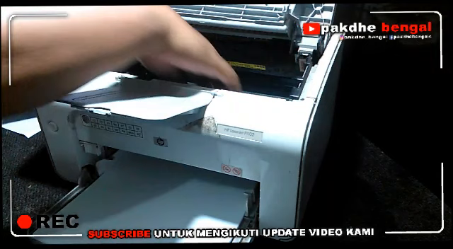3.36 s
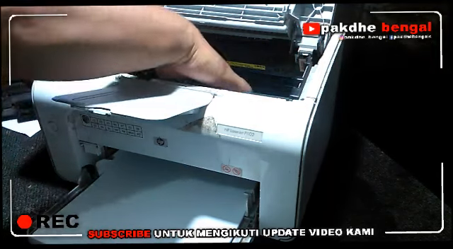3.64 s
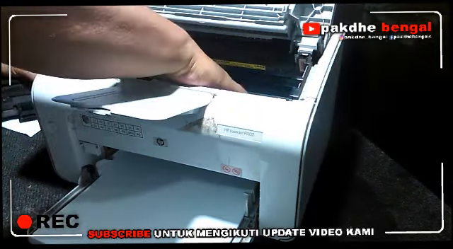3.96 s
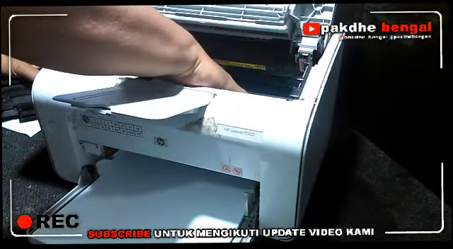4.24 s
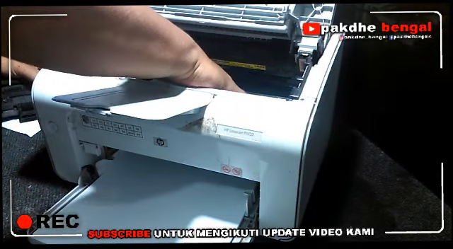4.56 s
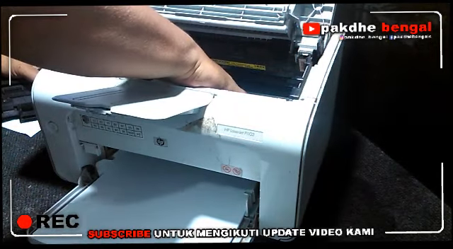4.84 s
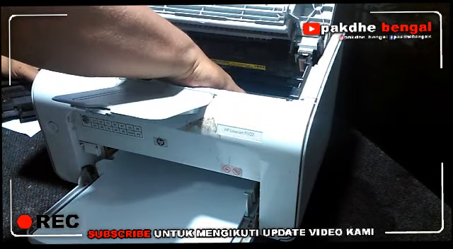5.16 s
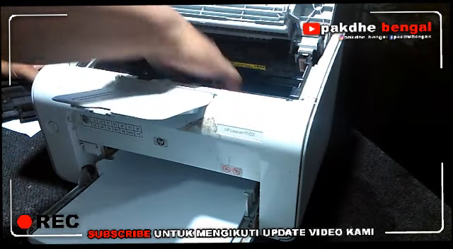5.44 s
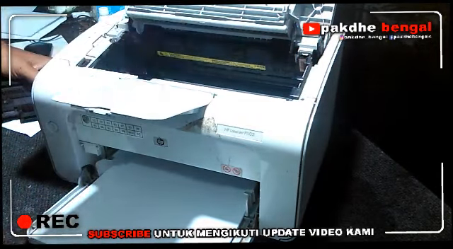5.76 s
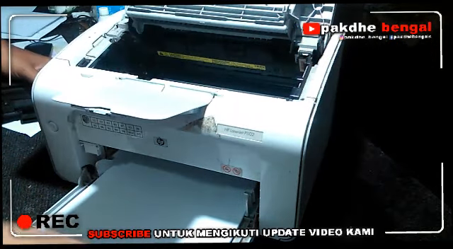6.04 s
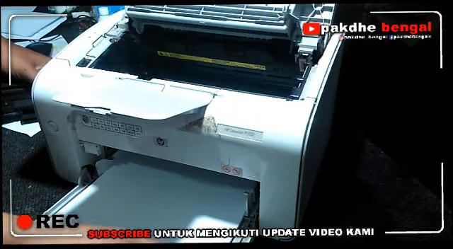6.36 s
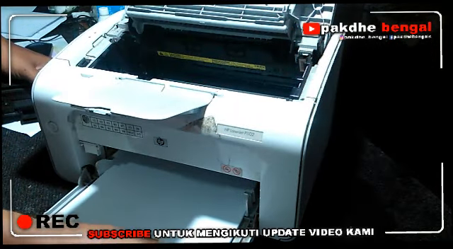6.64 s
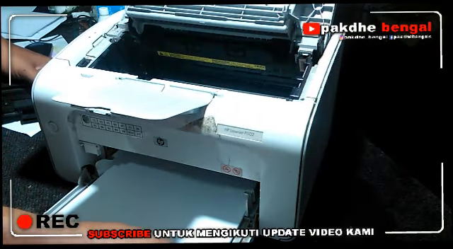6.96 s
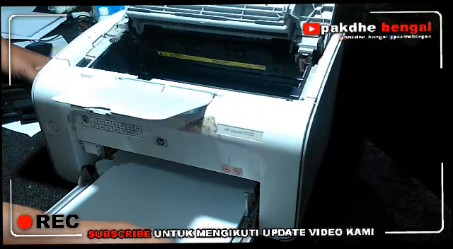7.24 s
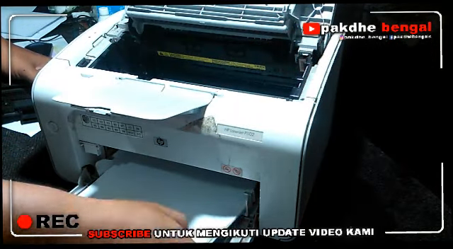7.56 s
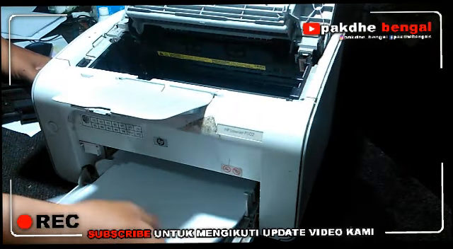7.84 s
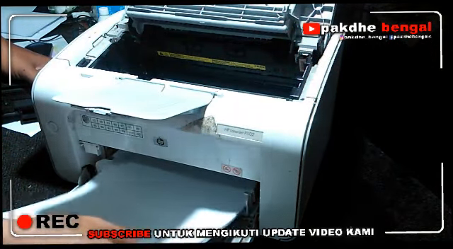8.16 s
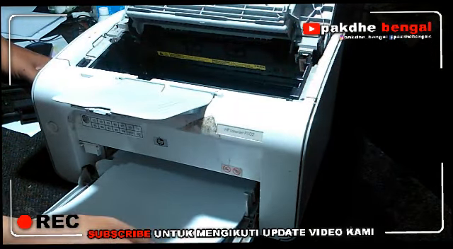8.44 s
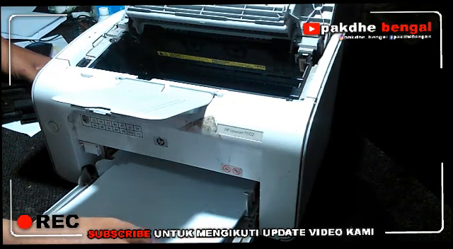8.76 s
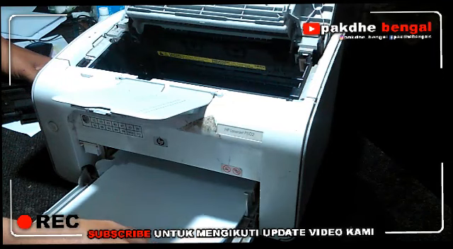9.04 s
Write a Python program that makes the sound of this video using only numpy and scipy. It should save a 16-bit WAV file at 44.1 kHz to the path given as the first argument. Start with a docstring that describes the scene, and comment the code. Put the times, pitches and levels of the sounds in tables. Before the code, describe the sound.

In a small room, hard plastic snaps, knocks and rattles as a hand seats a cartridge in a printer. The handling turns quiet, with light rubs and scattered taps, before sheets of paper are squared in the tray with crisp ticks and short swishes. High crickets, a thin hiss and a low hum continue behind. The microphone is muffled on the left, so the treble sits right.

```python
"""Plastic clacks open the scene: a hand seats a toner cartridge in a desktop printer, where it scrapes,
latches and rattles in its guides. Each hit is an edge snap, a panel knock and a chassis thump, with a
small room's tail. Fingers then brush the housing and square a stack of paper in the tray, all soft ticks
and grainy friction. Behind it, two crickets chirp on their wing resonances over a faint hum.
The left microphone port is muffled, so the highs sit to the right."""
import sys
import numpy as np
from scipy import signal
from scipy.fft import rfft, irfft, next_fast_len
from scipy.io import wavfile
from scipy.ndimage import map_coordinates

SR = 44100
rng = np.random.default_rng(int(sys.argv[2]) if len(sys.argv) > 2 else 0)


def generate_wav(sig):
    """Save sig (samples, or channels by samples) to the path in sys.argv[1] as 16-bit PCM at SR."""
    pcm = np.round(np.clip(np.atleast_2d(sig).T, -1, 1) * 32767).astype(np.int16)
    wavfile.write(sys.argv[1], SR, pcm)


N = 401310

# Tone colours. Each row: frequency in Hz, relative level in dB.
RUMBLE_EQ = [(20, -13), (45, -3.5), (75, 3.5), (160, 0.5), (300, 1.5), (440, 0), (540, -6), (800, -9),
             (1300, -25), (3000, -54.5)]  # the room's low end
SHIMMER_EQ = [(300, -17), (1000, -11), (2200, -12.5), (3300, -20.5), (4800, -22.5), (6100, -15),
              (7400, 3.5), (8400, -2), (10000, -9), (12800, -12.5), (14000, -10)]  # high, steady air
PAPER_EQ = [(300, -33), (1500, -36), (2600, 4.5), (3600, 0), (5500, -6), (7800, 7), (10000, -8.5),
            (13000, -27.5)]  # sheet on sheet
SKIN_EQ = [(500, -13), (2500, -7.5), (5000, -4.5), (7800, 6), (10000, -3), (14000, -8)]  # brushing fingers
GUIDE_EQ = [(400, -11.5), (1000, -6), (1700, -4.5), (3000, -10), (5000, -7.5), (7600, -2), (14000, -24.5)]  # the cartridge's scrape
TICK_EQ = [(1500, -49), (2800, -8), (4300, 2.5), (6000, 4.5), (7600, 7.5), (9500, -1.5), (14000, -14)]  # a lightly tapped edge
SNAP_EQ = [(1500, -23), (3000, -11.5), (4300, -6.5), (6000, -6), (7600, 1.5), (9000, -4.5), (11000, -13),
           (14000, -19)]  # a hard-hit edge
PANEL_EQ = [(150, -46.5), (350, -1.5), (700, 1), (1300, 1.5), (2800, 0), (4500, -5), (9000, -45)]  # hollow plastic
CHASSIS_EQ = [(25, -22.5), (45, -7), (70, 1), (130, -6), (220, -7.5), (320, -14), (700, -45)]  # the weight under a hit
LEFT_PORT_EQ = [(100, 0.5), (260, -1.5), (500, -4.5), (1000, -9), (2500, -20), (4500, -30.5), (7500, -44.5),
                (14000, -23)]  # the muffled side
# How alike the two ports sound. Each row: frequency in Hz, left-right correlation.
PORT_CORRELATION = [(60, 0.81), (150, 0.74), (300, 0.64), (700, 0.55), (1500, 0.16), (4000, .03)]
# An appliance's hum. Each row: frequency in Hz, level in dB.
HUM_PARTIALS = [(220, -71), (458, -65.5)]
# Fader rides. Each row: time in seconds, relative level in dB.
RUMBLE_RIDE = [(0, -64.5), (3.5, -64.5), (5, -63), (7.4, -61.5), (9.1, -64.5)]
SLOW_CRICKET_RIDE = [(0, -56.5), (3.4, -55.5), (4.4, -60), (7, -55.5)]
# Each cricket's pace. Each row: time in seconds, chirps sung so far.
FAST_CHIRP_COUNT = [(0, -.08), (2.364, 20), (4.952, 42), (6.023, 51), (9.15, 78)]
SLOW_CHIRP_COUNT = [(0, .05), (3.03, 10), (4.93, 16), (7.11, 23), (8.01, 26), (9.3, 30)]
# The hand leans on the chassis. Each row: start in seconds, level in dB.
HAND_PRESSES = [(2.48, -52), (2.76, -59.5), (3.08, -62.5), (3.84, -52.5), (4.3, -62), (4.681, -64.5)]
# Sliding strokes. Each row: start in seconds, length in seconds, relative level in dB.
PAPER_SLIDES = [(7.15, 0.17, -71), (7.51, 0.06, -58), (7.92, 0.16, -52), (8.06, 0.12, -46),
                (8.365, 0.077, -48.5), (8.44, 0.22, -57.5)]  # sheets slide over each other
FINGER_BRUSHES = [(2.82, 0.18, -68.5), (3.22, 0.19, -56), (3.52, 0.05, -52.5), (3.6, 0.18, -61.5),
                  (3.8, 0.22, -69.5), (4.5, 0.23, -70.5), (6.25, 0.13, -66), (6.59, 0.052, -67),
                  (7.66, 0.054, -52.5)]  # skin on the plastic and the top sheet
GUIDE_PUSHES = [(0.31, 0.62, -64), (0.85, 0.39, -57.5), (1.82, 0.28, -43.5)]  # the cartridge runs along its guides
# Plastic squeezes on plastic. Each row: centre in seconds, half-length in seconds, level in dB,
# pitch in Hz.
PLASTIC_RUBS = [(0.338, 0.039, -59.5, 1980), (0.447, 0.031, -50, 1740), (0.738, 0.041, -52, 1460),
                (1.575, 0.018, -47.5, 1600), (1.801, 0.0098, -41.5, 4800), (3.013, 0.019, -58, 4600),
                (3.547, 0.035, -62.5, 880), (3.865, 0.031, -55.5, 770), (8.691, 0.019, -45, 823),
                (8.831, 0.018, -60, 2430)]
# Fingers and sheet edges tap. Each row: start in seconds, relative snap, knock and thump levels in dB,
# panel pitch in Hz.
LIGHT_TAPS = [ (0.421, -71, -53, -71, 1530), (0.494, -56, -65, -47, 2740), (2.848, -51.5, -52.5, -70, 1760),
              (3.518, -56.5, -62, -55, 970), (3.846, -80, -58, -45, 800), (4.232, -50.5, -65, -60.5, 2320),
              (5.467, -51, -47, -55, 1580), (5.476, -46.5, -44, -43, 1290), (5.497, -43.5, -50, -41.5, 683),
              (7.182, -64, -62.5, -45.5, 3050), (7.277, -67, -64, -50.5, 1200),
              (7.550, -34.5, -37.5, -48, 3030), (7.592, -47.5, -71, -52, 1400),
              (7.678, -41, -67, -65, 2500), (7.728, -46, -83, -69, 2500), (7.875, -43, -58.5, -75, 2520),
              (7.910, -41, -47.5, -64, 1090), (7.928, -41, -40, -72, 2770),
              (8.045, -47.5, -49.5, -46, 1100), (8.379, -44.5, -60.5, -51, 2600),
              (8.524, -52.5, -44.5, -74, 1430), (8.679, -53, -57, -54.5, 900)]
# The cartridge hits the housing. Each row: start in seconds, relative snap, knock and thump levels in dB,
# panel pitch in Hz, snap and knock loss per rebound in dB.
CARTRIDGE_CLACKS = [ (0.001, -32.5, -43, -51.5, 4800, 4.5), (0.851, -34.5, -39.5, -44, 1800, 20.5),
                    (0.863, -29, -31, -33, 680, 5), (1.017, -52, -41, -46, 900, 2.5),
                    (1.046, -42.5, -34, -47, 1560, 0), (1.056, -17.5, -27.5, -39.5, 1390, 18),
                    (1.424, -44, -56.5, -54.5, 2970, 18.5), (1.601, -22.5, -30, -31.5, 1260, -0.5),
                    (1.648, -13.5, -25, -38, 1880, 15), (1.813, -35.5, -64, -54, 4630, 22),
                    (1.854, -28.5, -34, -32.5, 804, 12), (1.930, -29.5, -34, -36.5, 710, 7.5),
                    (2.034, -24.5, -29.5, -42.5, 1160, 17), (2.092, -33, -54, -36, 1500, 11),
                    (2.115, -36, -35.5, -37, 1180, 15.5), (2.171, -35, -39, -41.5, 353, 23),
                    (2.186, -36, -35, -47, 1300, 16), (2.218, -46.5, -43, -54, 680, 26)]

CONTACT_TIME = np.arange(-SR // 20, SR * 9 // 20) / SR  # seconds around a contact


def amp(db):
    """Decibels to gain."""
    return 10 ** (np.asarray(db) / 20)


def unit(x):
    """Scale to rms 1."""
    return x / np.sqrt(np.mean(x ** 2) + 1e-20)


def along(points, hz):
    """Read (Hz, value) points on a log frequency axis."""
    f, v = np.transpose(points)
    return np.interp(np.log(hz + 1), np.log(f + 1), v)


def curve(rows):
    """Automation: (seconds, value) rows as one value per sample."""
    return np.interp(np.arange(N) / SR, *np.transpose(rows))


def wobble(rate):
    """Smooth random modulation, with rate knots a second."""
    return map_coordinates(rng.standard_normal(int(N * rate / SR) + 4), [np.arange(N) * rate / SR])


def filtered(x, response):
    """Shape x with a frequency response."""
    size = next_fast_len(N + SR // 2)
    return irfft(rfft(x, size) * response(np.fft.rfftfreq(size, 1 / SR)), size)[..., :N]


def noise(eq):
    """Two unrelated noises of rms 1 in the given colour."""
    return unit(filtered(rng.standard_normal((2, N)), lambda hz: amp(along(eq, hz))))


def resonance(hz, centre, half_width):
    """A bell-shaped peak of height 1."""
    return 1 / (1 + ((hz - centre) / half_width) ** 2)


def swell(start, rise, length, t60):
    """Envelope of one movement: it builds over rise, holds until length, then dies away."""
    t = np.arange(N) / SR - start
    return np.clip(t / rise, 0, 1) * amp(-60 * np.maximum(t - length, 0) / t60)


def burst(response, envelope, uneven_db=4.5):
    """Shaped noise as dense damped modes; each contact point favours some and starves others."""
    size = len(envelope)
    hz = np.fft.rfftfreq(size, 1 / SR)
    favour = map_coordinates(rng.standard_normal(400), [2 * np.sqrt(hz)], order=1)
    spectrum = rfft(rng.standard_normal((2, size))) * response(hz) * amp(uneven_db * favour)
    return envelope * unit(irfft(spectrum, size))


def room_tone():
    """The bed: low rumble, an appliance's wavering hum and a high, steady shimmer."""
    t = np.arange(N) / SR
    hum = np.zeros((2, N))
    for hz, db in HUM_PARTIALS:
        peak = np.sqrt(2) * amp(db + 3.1 * wobble(8))
        hum[1] += peak * np.sin(2 * np.pi * hz * t + 0.6 * wobble(9))
    rumble = amp(curve(RUMBLE_RIDE) + 3.5 + wobble(13)) * noise(RUMBLE_EQ)
    shimmer = amp(-58.5 + .5 * wobble(1.7)) * noise(SHIMMER_EQ)
    return rumble + hum + shimmer


def cricket(chirp_count, wing_hz, half_width_hz, chirp_width, echo_t60):
    """Each chirp swells and fades on the wing's resonance; echoes blur it into a narrow rasp."""
    phase = (curve(chirp_count) + .5) % 1 - .5  # in chirp cycles, like chirp_width
    power = np.exp(-(phase / chirp_width) ** 2)
    feedback = amp(-60 / (echo_t60 * SR)) ** 2
    echo = signal.lfilter([1 - feedback], [1, -feedback], power)
    white = rng.standard_normal((2, N))
    wing = unit(filtered(white, lambda hz: resonance(hz, wing_hz, half_width_hz) ** 1.06))
    return amp(wobble(15)) * wing * np.sqrt(power + .5 * echo)


def chassis_rocking(rise_s=0.035, t60=1.58):
    """The hand's pressure makes the chassis drum softly on the table."""
    body = unit(filtered(rng.standard_normal((2, N)), lambda hz: resonance(hz, centre=81, half_width=8)))
    power = sum((amp(db) * swell(start, rise_s, rise_s, t60)) ** 2 for start, db in HAND_PRESSES)
    return np.sqrt(power) * body


def sliding(strokes, eq, rise_share, t60, grain_db):
    """Friction: tiny catches and slips, gathering speed over the first rise_share of each stroke."""
    power = sum((amp(db) * swell(start, rise_share * length, length, t60)) ** 2
                for start, length, db in strokes)
    texture = noise(eq) * amp(grain_db * wobble(500) + 1.1 * wobble(40))
    return np.sqrt(power) * unit(texture)


def plastic_rubs(relative_width=0.079, hiss_db=-11.5):
    """Brief stick-slip squeezes: a rough band around one panel resonance."""
    t = np.arange(-SR // 6, SR // 6) / SR
    out = np.zeros((2, N + SR))
    for centre, half_length, db, pitch in PLASTIC_RUBS:
        band = lambda hz: ((hz > 300) * resonance(hz, pitch, relative_width * pitch)
                           + amp(hiss_db) * (hz < 2 * pitch))
        grit_db = 2 * map_coordinates(rng.standard_normal(130), [(t - t[0]) * 300])
        stroke = amp(db + grit_db) * np.exp(-(t / half_length) ** 2)
        first = max(round((centre + t[0]) * SR), 0)
        out[:, first:first + len(t)] += burst(band, stroke)
    return out[:, :N]


def hit_envelope(rise, t60, room_db, room_t60):
    """A brief slide into the contact, a fast decay in the plastic, the room's tail; times in seconds."""
    after = np.maximum(CONTACT_TIME, 0)
    slide = amp(-18) * np.exp(-abs(CONTACT_TIME) / .009)
    decay = np.hypot(amp(-60 * after / t60), amp(room_db - 60 * after / room_t60))
    return (1 - np.exp(-after / rise)) * decay + slide


def housing_hits(rows, edge_eq, snap, knock, thump, ring_sharpness, ring_db=5):
    """Hard edges snap, the struck panel knocks at its own pitch, the heavy chassis adds a thump."""
    out = np.zeros((2, N + SR))
    for start, snap_db, knock_db, thump_db, pitch in rows:
        ring = lambda hz: amp(ring_db) * resonance(hz, pitch, pitch / ring_sharpness)
        hit = amp(snap_db) * burst(lambda hz: amp(along(edge_eq, hz)), snap)
        hit += amp(knock_db) * burst(lambda hz: amp(along(PANEL_EQ, hz)) + ring(hz), knock)
        hit += amp(thump_db) * burst(lambda hz: amp(along(CHASSIS_EQ, hz)), thump)
        first = round(start * SR)
        out[:, first:first + len(snap)] += hit
    lead_in = np.sum(CONTACT_TIME < 0)
    return out[:, lead_in:lead_in + N]


def taps():
    """Fingers and sheet edges tick softly against the housing."""
    snap = amp(9.5) * hit_envelope(rise=0.0025, t60=0.026, room_db=-9.5, room_t60=0.19)
    knock = amp(9.5) * hit_envelope(rise=0.0023, t60=0.046, room_db=-8.5, room_t60=0.2)
    thump = amp(-2.5) * hit_envelope(rise=0.0063, t60=0.17, room_db=-6.5, room_t60=0.41)
    return housing_hits(LIGHT_TAPS, TICK_EQ, snap, knock, thump, ring_sharpness=5.7)


def rebounds(clacks, count=3, first_flight_s=0.015, shrink=0.85, thump_loss_db=4):
    """A loose part bounces: each clack becomes a run of contacts, ever closer and mostly weaker."""
    flights = first_flight_s * shrink ** np.arange(count)
    delays = np.cumsum(flights) - flights
    return [(start + delay, snap - k * loss, knock - k * loss, thump - k * thump_loss_db, pitch)
            for start, snap, knock, thump, pitch, loss in clacks for k, delay in enumerate(delays)]


def cartridge():
    """The lead sound: the cartridge drops in, latches and rattles home."""
    snap = amp(8.5) * hit_envelope(rise=0.0028, t60=0.048, room_db=-11, room_t60=0.27)
    knock = amp(6.5) * hit_envelope(rise=0.0017, t60=0.034, room_db=-7.5, room_t60=0.26)
    thump = amp(1.5) * hit_envelope(rise=0.0037, t60=0.071, room_db=-5, room_t60=0.46)
    chatter = amp(0.66 * wobble(350))  # loose parts buzz against each other
    hits = housing_hits(rebounds(CARTRIDGE_CLACKS), SNAP_EQ, snap, knock, thump, ring_sharpness=14)
    return chatter * hits


def microphone_ports(pair, lag_s=.00018):
    """Long waves reach both ports alike; the left hears them a little later and loses its treble."""
    unrelated, right = pair
    alike = lambda hz: along(PORT_CORRELATION, hz)
    left = filtered(right, alike) + filtered(unrelated, lambda hz: np.sqrt(1 - alike(hz) ** 2))
    muffle = lambda hz: amp(along(LEFT_PORT_EQ, hz)) * np.exp(-2j * np.pi * hz * lag_s)
    return np.array([filtered(left, muffle), right])


def scene():
    """The mix, back to front, through two ports that add a faint hiss of their own."""
    fast = cricket(FAST_CHIRP_COUNT, wing_hz=7176, half_width_hz=210, chirp_width=0.165, echo_t60=0.24)
    slow = cricket(SLOW_CHIRP_COUNT, wing_hz=5559, half_width_hz=110, chirp_width=0.17, echo_t60=0.38)
    crickets = amp(-53) * fast + amp(curve(SLOW_CRICKET_RIDE)) * slow
    paper = sliding(PAPER_SLIDES, PAPER_EQ, rise_share=0.31, t60=0.16, grain_db=2)
    skin = amp(7) * sliding(FINGER_BRUSHES, SKIN_EQ, rise_share=0.7, t60=0.35, grain_db=1.5)
    guides = sliding(GUIDE_PUSHES, GUIDE_EQ, rise_share=0.081, t60=0.375, grain_db=2.5)
    friction = paper + skin + guides + plastic_rubs()
    mix = room_tone() + crickets + chassis_rocking() + friction + taps() + cartridge()
    return microphone_ports(mix) + amp(-75) * rng.standard_normal((2, N))


def record(dry):
    """The output stage flattens peaks just under full scale, thins the sub-bass and cuts the very top."""
    ceiling, bass_cut_hz, top_hz = .9, 34, 14300
    passband = lambda hz: hz ** 2 / np.hypot(hz ** 2, bass_cut_hz ** 2) * (hz < top_hz)
    return filtered(np.clip(dry, -ceiling, ceiling), passband)


dry = scene()
out = record(dry)
generate_wav(out)
```